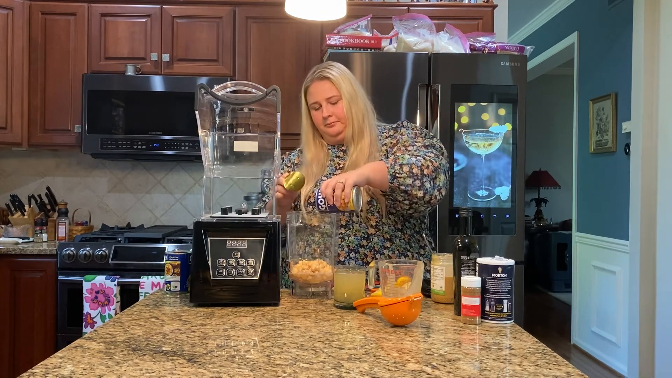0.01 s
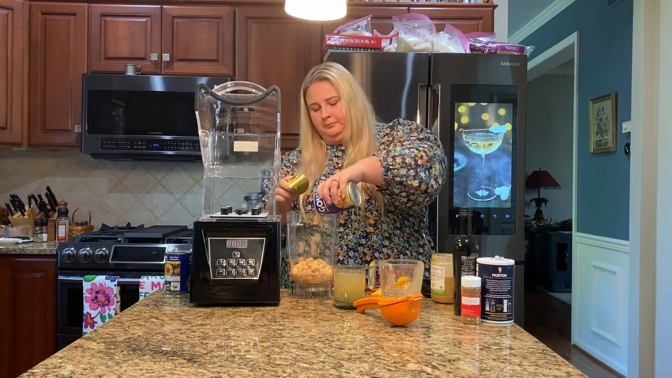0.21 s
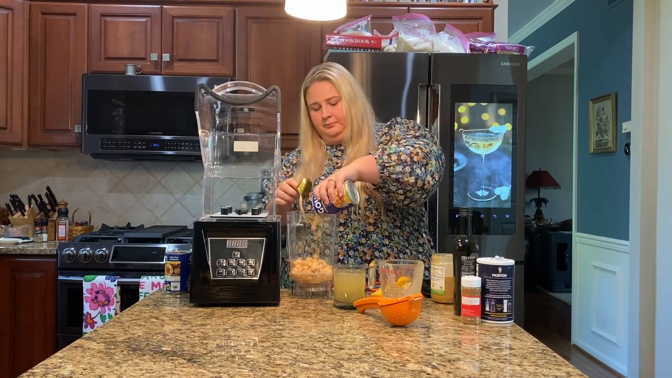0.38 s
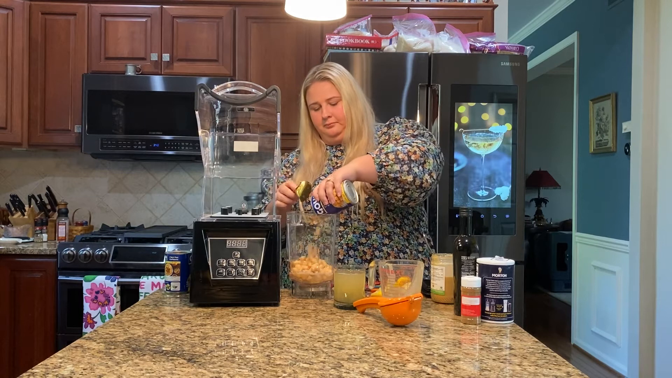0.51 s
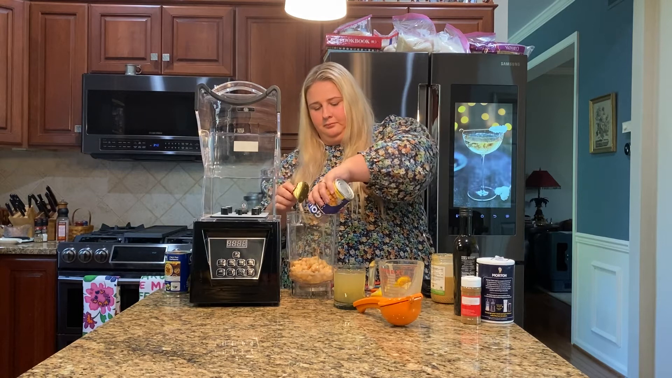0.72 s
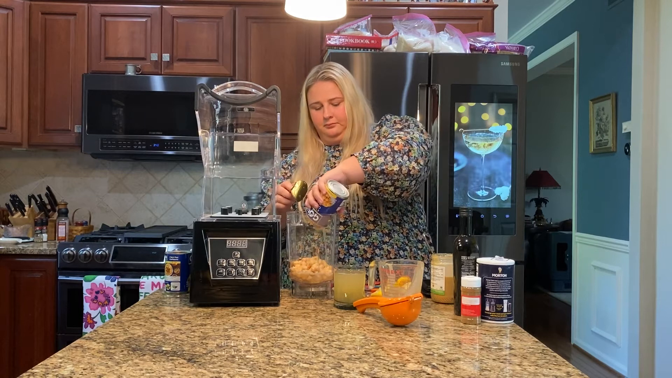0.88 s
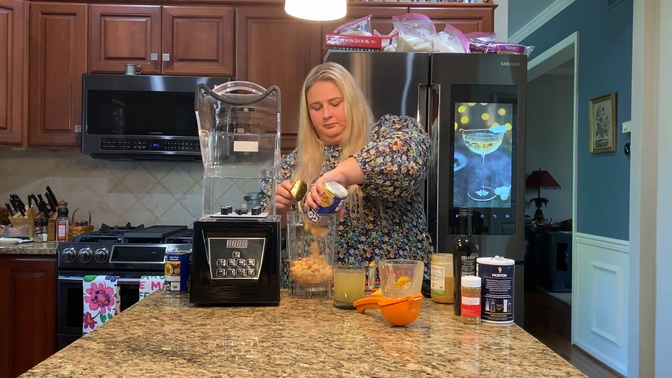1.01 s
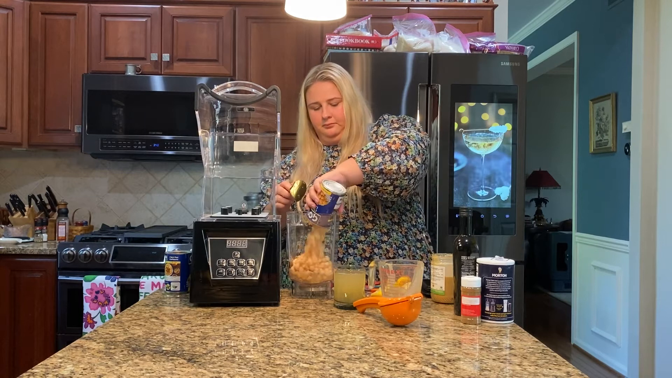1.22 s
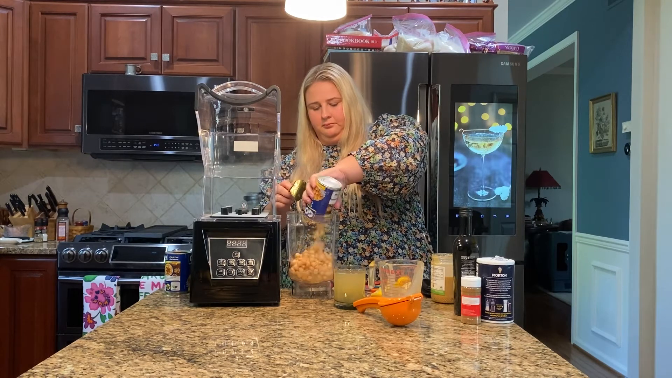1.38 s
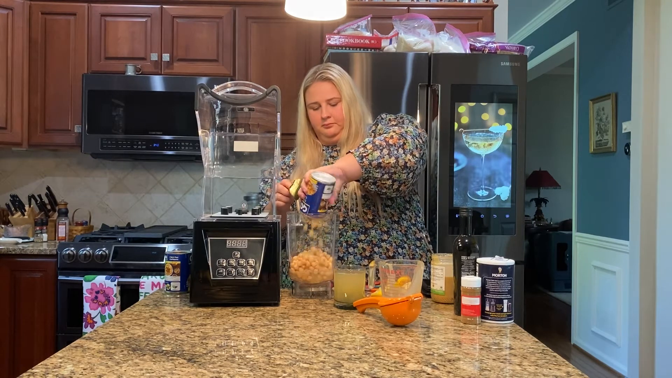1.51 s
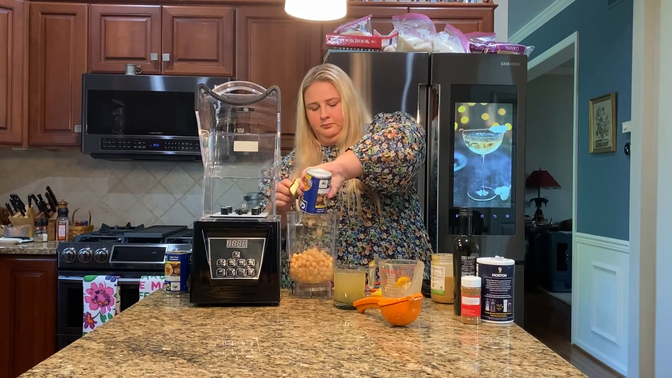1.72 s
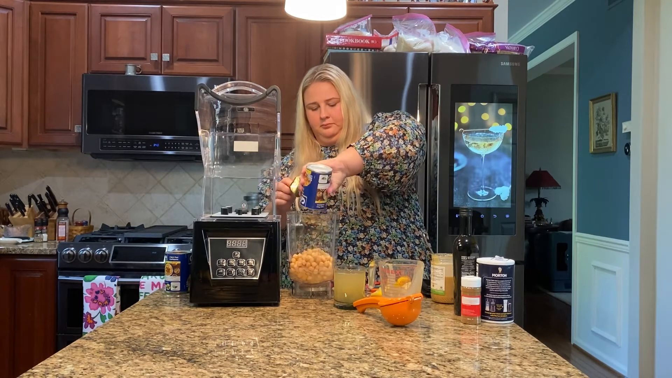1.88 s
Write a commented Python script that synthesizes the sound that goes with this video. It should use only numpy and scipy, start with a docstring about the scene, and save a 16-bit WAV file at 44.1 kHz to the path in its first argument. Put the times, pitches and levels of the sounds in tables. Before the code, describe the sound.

Close to the microphone, wet chickpeas plop into a container in two bursts. Between them the metal can clinks and gulps softly; small wet ticks and a dull scrape come through over a faint kitchen hum.

```python
"""A quiet kitchen hum and a faint patter come first, then soft low thuds close to the stereo microphone:
chickpeas drop in clumps from a tilted can onto the heap in a hollow vessel and ring its modes.
The can's thin wall clinks, with small wet ticks and a dull scrape in between. Near one second the can
tips further, air gulps in, and the wet mass slides out with a sticky rustle and more thuds.
The kitchen answers with a short reverberation."""
import sys
import numpy as np
from scipy import signal
from scipy.fft import rfft, irfft, next_fast_len
from scipy.io import wavfile
from scipy.ndimage import map_coordinates

SR = 44100
rng = np.random.default_rng(int(sys.argv[2]) if len(sys.argv) > 2 else 0)


def store_wav(level_fs):
    """Save 16-bit WAV to argv[1]."""
    pcm = np.round(np.clip(np.atleast_2d(level_fs), -1, 1) * 32767)
    wavfile.write(sys.argv[1], SR, pcm.T.astype(np.int16))


N = 88200


def amp(db):
    """Decibels to gain."""
    return 10 ** (np.asarray(db) / 20)


def unit(x):
    """Scaled to rms 1."""
    return x / np.sqrt(np.mean(x ** 2) + 1e-20)


def along(points, hz):
    """Read (f/Hz, value) points on a log frequency axis."""
    f, values = np.transpose(points)
    return np.interp(np.log(hz + 1), np.log(f + 1), values)


def curve(points):
    """Join (t/s, value) points, one value per sample."""
    times, values = np.transpose(points)
    return np.interp(np.arange(N) / SR, times, values)


def wobble(per_s):
    """A smooth curve through per_s random knots a second."""
    knots = rng.standard_normal(int(N * per_s / SR) + 4)
    return map_coordinates(knots, [np.arange(N) * per_s / SR])


def filtered(x, response):
    """Pass x through a complex frequency response."""
    size = next_fast_len(x.shape[-1] + SR // 2)
    hz = np.fft.rfftfreq(size, 1 / SR)
    return irfft(rfft(x, size) * response(hz), size)[..., :x.shape[-1]]


def ring(blows, modes, attack_s=0.002316, settle_db=0, settle_s=0.026):
    """Each row of blows rings one mode (f/Hz, level/dB, t60/s); all crest together as the push peaks."""
    t = np.arange(SR // 4) / SR
    push = (1 - np.exp(-t / attack_s)) ** np.e
    settling = amp(settle_db * (1.5 - np.exp(-(t / settle_s) ** 4)))
    tones = np.array([amp(db - 60 * t / t60) * np.cos(2 * np.pi * hz * (t - 2 * attack_s))
                      for hz, db, t60, *_ in modes])
    return signal.fftconvolve(blows, tones * push * settling, axes=1)[:, :N]


# Diffuse sound at the microphone: f/Hz, left-right correlation
LIKENESS = [(60, 0.9), (240, 0.81), (930, 0.28), (3650, -0.092), (14300, -0.05)]
def stereo_noise(spectrum):
    """Shaped noise of rms 1, nearly alike on both sides in the bass and wide in the treble."""
    def mid_and_side(hz):
        angle = np.arccos(along(LIKENESS, hz)) / 2
        return amp(along(spectrum, hz)) * [np.cos(angle), np.sin(angle)]
    mid, side = filtered(rng.standard_normal((2, N)), mid_and_side)
    return unit(np.array([mid + side, mid - side]))


# Kitchen air all around the microphone: f/Hz, relative density/dB
AIR_TONE = [(15, -51), (25, -11), (65, 0), (180, -5), (217, -2.5), (763, -25.5), (849, -26.5),
            (1490, -33.5), (12300, -79.5), (14800, -49)]
def kitchen(air_db=-61, hum_db=-64.5, hum_hz=61):
    """Room air and a wavering low hum in the background."""
    waver_db = 3 * wobble(9)
    air = amp(air_db) * stereo_noise(AIR_TONE)
    hum = np.sin(2 * np.pi * hum_hz * np.arange(N) / SR + 0.27 * wobble(15))
    return air + hum * amp(hum_db + waver_db)


LOW_HZ, HIGH_HZ = 410, 740  # edges of the vessel's main modes
# Modes of the hollow vessel, close by: f/Hz, level/dB, t60/s, lean to the left/dB
VESSEL_MODES = [(315, -10, 0.053, 2), (380.5, 11, 0.068, 0.5), (441, -8, 0.074, -1),
                (506.3, -12.5, 0.085, -0.5), (532.2, -0.5, 0.076, -3), (650, -9.5, 0.026, -1.5),
                (777, 7, 0.053, 0.5), (887.7, -1, 0.056, -2.5), (1072, -9, 0.055, -0.5),
                (1258, -11, 0.021, 3.5), (1497, -22.5, 0.054, -1.5), (1879, -22.5, 0.047, -1)]
# Single peas in the vessel: t/s, level/dB
PATTER_LEVEL = [(0, -66), (.19, -68.5), (.3, -61), (.46, -54.5), (.64, -81.5), (.88, -85), (1.05, -65.5),
                (1.2, -62.5), (1.54, -66), (1.82, -81.5), (2, -82)]
def patter(peas_per_s=50, low_db=-9.5, high_db=-22.5):
    """Single peas land and roll at random moments, ringing the vessel; one row per mode."""
    landings = rng.random(N) < peas_per_s / SR
    mode_db = [[low_db * (hz < LOW_HZ) + high_db * (hz > HIGH_HZ)] for hz, *_ in VESSEL_MODES]
    blows = landings * rng.standard_normal((len(VESSEL_MODES), N)) * amp(mode_db)
    return unit(ring(blows, VESSEL_MODES)) * amp(curve(PATTER_LEVEL))


# Wet ticks near the microphone: t/s, level/dB, centre f/Hz
WET_TICKS = [(0.078, -65, 11400), (0.239, -62, 5380), (0.317, -62.5, 11000), (0.472, -58, 10100),
             (0.675, -62, 11800), (1.016, -60.5, 10900), (1.201, -46.5, 7930), (1.338, -51, 7760),
             (1.41, -55, 4580), (1.437, -51.5, 6800), (1.53, -56.5, 10800), (1.572, -51.5, 8240),
             (1.575, -57, 4540), (1.665, -53, 8400)]
def ticks(trim_db=-6.5, log_width=.4, snap_t60=.016, smear_t60=.38, smear_db=-10, rise_s=.0008):
    """Short wet snaps, each a band of noise that leaves a brief smear."""
    out = np.zeros(N + SR)
    t = np.arange(SR // 4) / SR
    decay = amp(-60 * t / snap_t60) + amp(smear_db - 60 * t / smear_t60)
    envelope = decay * (1 - np.exp(-t / rise_s))
    for s, db, hz in WET_TICKS:
        def band(f):
            ratio = (f + 1) / hz
            return np.exp(-.5 * (np.log(ratio) / log_width) ** 2) / np.sqrt(ratio)
        hiss = unit(filtered(rng.standard_normal(len(t)), band))
        out[round(s * SR):][:len(t)] += amp(db + trim_db) * hiss * envelope
    return out[:N]


# Swells of the scrape: t/s, level/dB
SCRAPE_LEVEL = [(0, -83), (.08, -74.5), (.14, -85), (.23, -89), (.245, -62), (.33, -81), (.43, -66),
                (.6, -84.5), (.9, -89.5), (1.12, -68), (1.25, -71), (1.5, -85), (1.59, -71.5), (1.7, -88),
                (2, -99)]
# Its colour at the microphone: f/Hz, relative density/dB
SCRAPE_SPECTRUM = [(800, -22), (1150, 0.5), (1450, 0.5), (1700, -1), (1850, -8), (2050, -0.5), (2500, -30)]
def scrape(flutter_db=0.81):
    """A dull, uneven scraping, spread wide between left and right."""
    return stereo_noise(SCRAPE_SPECTRUM) * amp(curve(SCRAPE_LEVEL) + flutter_db * wobble(50))


# Clumps landing on the heap, close by: t/s, level/dB, low-mode offset/dB, high-mode offset/dB
LANDINGS = [(0.12, -34, -15.5, -42), (.239, -11, -16.5, -22), (0.263, -38, -4, -37),
            (0.284, -29.5, -14, -36.5), (.341, -18.5, -23, -22), (.372, -27.5, -32.5, -18.5),
            (.386, -21.5, -18, -14), (.424, -13, -21, -16.5), (.452, -34.5, -4, -8), (.472, -27, -23, -26),
            (.541, -36, -4, -44), (.603, -44.5, -6, -17), (1.113, -15.5, -16, -23),
            (1.139, -23.5, -31, -28), (1.163, -29.5, -5, -18), (1.205, -34.5, 3, -13.5),
            (1.234, -27, 5, -16), (1.263, -24.5, -12, -26), (1.278, -49, 5, -8), (1.306, -18.5, -13.5, -20),
            (1.331, -37, 1, -33), (1.35, -34.5, -16, -40), (1.369, -47, 13, -40), (1.408, -42, 11, -2.5),
            (1.431, -40, -11, -20), (1.487, -23.5, -12, -18.5), (1.534, -31, -22, -34),
            (1.57, -48.5, 10, -8.5), (1.647, -27, -11.5, -37), (1.694, -60.5, -1, -25),
            (1.838, -43, -4.5, -29), (1.863, -34, -4, -27.5), (1.888, -51.5, 6, -32)]
def clumps(scatter_db=1.5, lead_s=0.002):
    """Each clump strikes its own spot and mix of vessel modes; the settling heap muffles the ring."""
    register = np.digitize([hz for hz, *_ in VESSEL_MODES], [LOW_HZ, HIGH_HZ])
    blows = np.zeros((len(VESSEL_MODES), N))
    for s, db, low_db, high_db in LANDINGS:
        mode_db = db + np.array([low_db, 0, high_db])[register]
        scatter = rng.standard_normal(len(VESSEL_MODES))
        blows[:, round((s - lead_s) * SR)] = amp(mode_db + scatter_db * scatter)
    return ring(blows, VESSEL_MODES, settle_db=-7.5)


# Modes of the can's wall: f/Hz, level/dB, t60/s
CAN_MODES = [(2010, 0, .07), (2700, -1, .08), (3220, 0, .045), (3500, -2, .04), (4200, 0, .07),
             (4550, -2, .05), (5140, -3, .055), (6250, -6, .05), (6820, -8, .05)]
# Knocks on the can, above the vessel: t/s, level/dB, centre f/Hz
CAN_KNOCKS = [(0.239, -64.5, 2200), (0.424, -61.5, 2290), (0.443, -67, 2175), (.456, -67.5, 2870),
              (0.873, -70.5, 3030), (0.917, -77.5, 3100), (0.963, -61.5, 3440), (.992, -73, 4070),
              (1.062, -59.5, 3820), (1.079, -62.5, 4900), (1.168, -62.5, 4240), (1.187, -60, 3350),
              (1.264, -60.5, 2960)]
def clinks(db_per_octave=-22, scatter_db=2, detune=.008):
    """Light knocks, each loudest around its own pitch and bending the thin wall a little differently."""
    out = np.zeros(N)
    for s, db, centre_hz in CAN_KNOCKS:
        scatter, bends = rng.standard_normal((2, len(CAN_MODES)))
        octaves_away = np.abs(np.log2([hz / centre_hz for hz, *_ in CAN_MODES]))
        strengths = amp(db + db_per_octave * octaves_away + scatter_db * scatter)
        blows = np.outer(strengths, np.arange(N) == round(s * SR))
        bent_modes = [(hz * (1 + detune * bend), *rest) for (hz, *rest), bend in zip(CAN_MODES, bends)]
        out += ring(blows, bent_modes, attack_s=0.0006).sum(0)
    return out


# Bubbles at the can: t/s, level/dB, f/Hz
AIR_GULPS = [(0.903, -47.5, 368.6), (0.969, -45, 315.5), (1.016, -39.5, 295), (1.051, -42.5, 274)]
def gulps(t60=0.092):
    """Air gulps into the can, each time ringing as one soft low bubble."""
    blows = np.zeros((len(AIR_GULPS), N))
    for row, (s, *_) in enumerate(AIR_GULPS):
        blows[row, round(s * SR)] = 1
    return ring(blows, [(hz, db, t60) for _, db, hz in AIR_GULPS]).sum(0)


# The mass leaving the can, barely heard until about 1 s: t/s, level/dB
SLIDE_LEVEL = [(0, -85), (.45, -84), (.7, -88), (.95, -85.5), (.97, -76), (1.05, -78), (1.07, -68.5),
               (1.2, -68.5), (1.3, -70), (1.42, -71), (1.53, -81), (1.58, -77.5), (1.65, -83.5), (1.8, -86),
               (2, -88)]
# Its rustle at close range: f/Hz, relative density/dB
RUSTLE_SPECTRUM = [(1200, -45), (2200, 1.5), (4000, -1.5), (7000, -4), (9000, -6.5), (12500, -5.5),
                   (14800, -18)]
def slide(grains_per_s=170, grain_s=.0008, grain_db=-9, nudges_per_s=450, rattle_db=-10.5, flutter_db=2):
    """The wet mass rustles with sticky grains and keeps nudging the can's wall."""
    spikes = (rng.random(N) < grains_per_s / SR) * rng.exponential(size=N)
    grain_decay = np.exp(-np.arange(300) / (grain_s * SR))
    grains = unit(np.convolve(spikes, grain_decay)[:N])
    rustle = unit(stereo_noise(RUSTLE_SPECTRUM)[0] * (1 + amp(grain_db) * grains))
    shape = (len(CAN_MODES), N)
    nudges = (rng.random(shape) < nudges_per_s / SR) * rng.standard_normal(shape)
    rattle = amp(rattle_db) * unit(ring(nudges, CAN_MODES, attack_s=0.00013).sum(0))
    return (rustle + rattle) * amp(curve(SLIDE_LEVEL) + flutter_db * wobble(29.14))


# Reverberation from the kitchen walls, farther off: f/Hz, t60/s
ROOM_DECAY = [(300, 0.31), (1000, 0.28), (8000, 0.19)]
def room(x, rise_s=0.01):
    """The kitchen's answer builds up, then each frequency dies at its own speed."""
    hz, t, noise = signal.stft(rng.standard_normal((2, SR // 2)), SR, nperseg=256)
    decay = amp(-60 * t / along(ROOM_DECAY, hz)[:, None])
    build_up = 1 - np.exp(-(t / rise_s) ** 2)
    _, tail = signal.istft(noise * decay * build_up, SR, nperseg=256)
    return signal.fftconvolve(x[None], tail / np.linalg.norm(tail[0]), axes=1)[:, :N]


# Phase between the microphone's two ports: f/Hz, left lead/rad
PORT_PHASE = [(1500, .3), (3000, -.5), (6000, -1.0), (7150, 1.2), (8400, 2.9), (9600, 3.4), (11800, 6.1),
              (14500, 8)]
def scene(bass_cut_hz=240, right_db=1.37, lean_below_hz=6500, vessel_room_db=-6.5, can_room_db=-12):
    """Each vessel mode radiates to its own side; the can's treble reaches the two ports out of step."""
    side = np.array([[1], [-1]])  # left, right
    lean_db = -right_db * side
    # The vessel is too small to radiate bass.
    modes = filtered(clumps() + patter(), lambda f: (1j * f / (bass_cut_hz + 1j * f)) ** 2)
    vessel = amp(side * [left_db for *_, left_db in VESSEL_MODES]) @ modes

    def ports(hz):
        return np.exp(.5j * side * along(PORT_PHASE, hz)) * amp(lean_db * (hz < lean_below_hz))
    can = slide() + ticks() + clinks() + gulps()
    reverb = amp(vessel_room_db) * room(modes.sum(0)) + amp(can_room_db) * room(can)
    diffuse = reverb + scrape() + kitchen()
    return vessel + filtered(can, ports) + diffuse * amp(lean_db)


def record(dry, top_hz=14900):
    """The microphone passes nothing above its band limit."""
    return filtered(dry, lambda hz: hz < top_hz)


dry = scene()
out = record(dry)
store_wav(out)
```